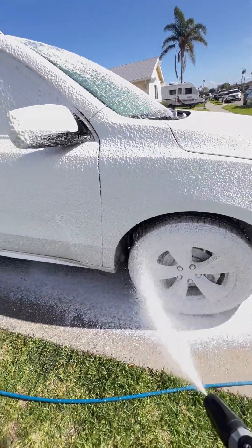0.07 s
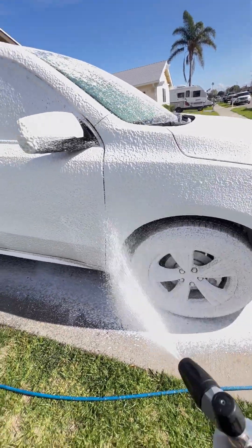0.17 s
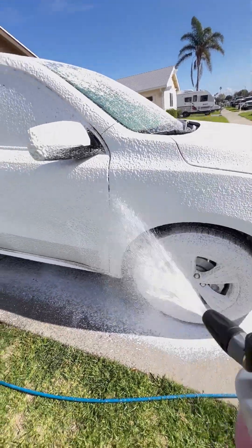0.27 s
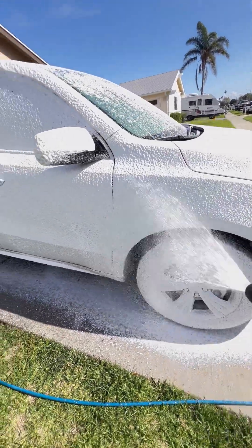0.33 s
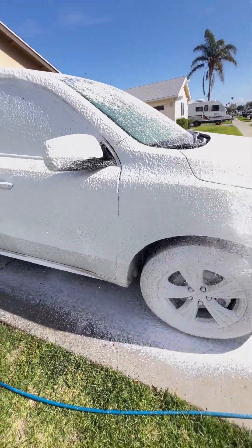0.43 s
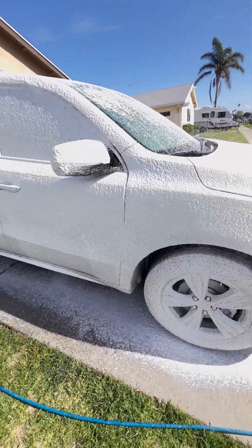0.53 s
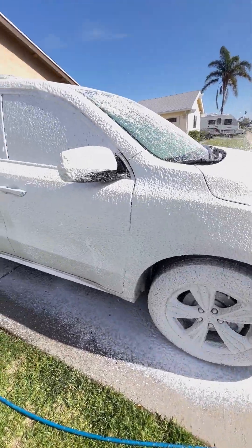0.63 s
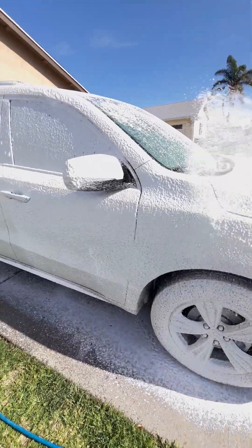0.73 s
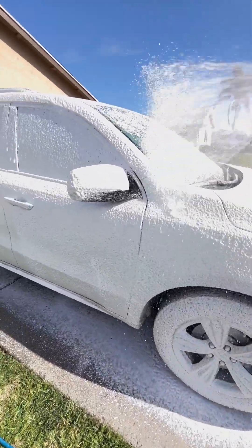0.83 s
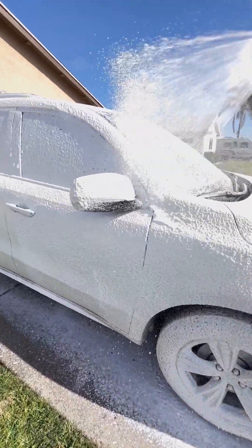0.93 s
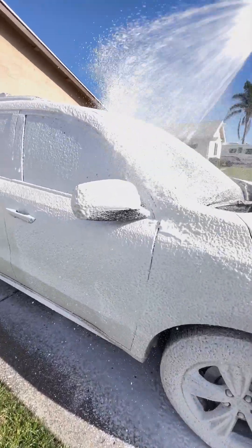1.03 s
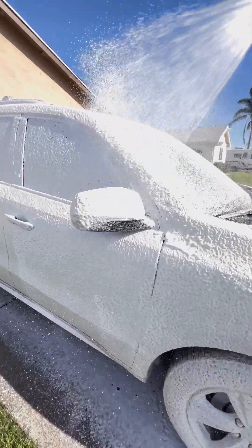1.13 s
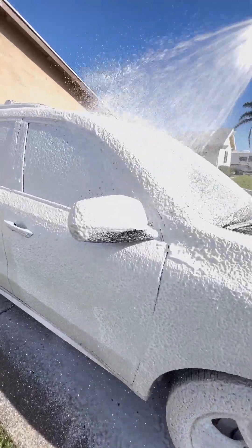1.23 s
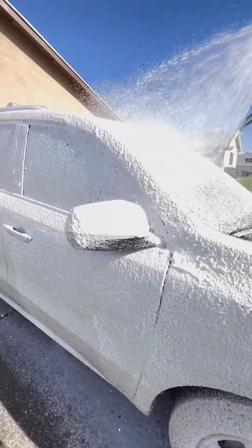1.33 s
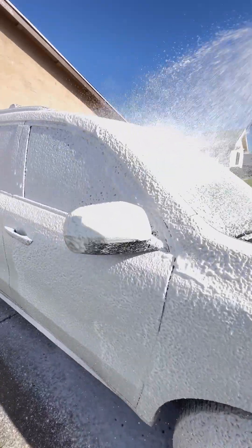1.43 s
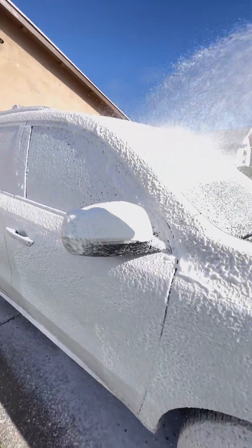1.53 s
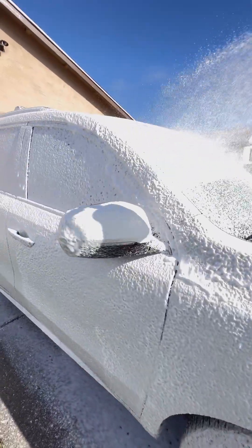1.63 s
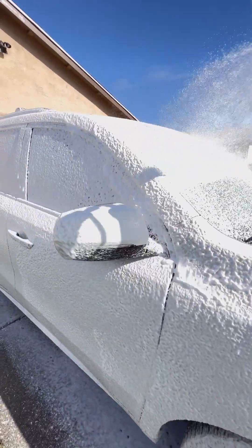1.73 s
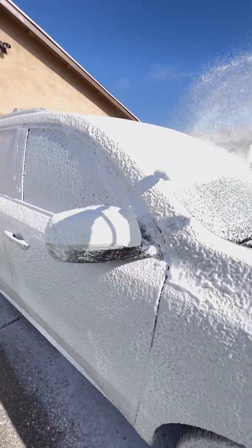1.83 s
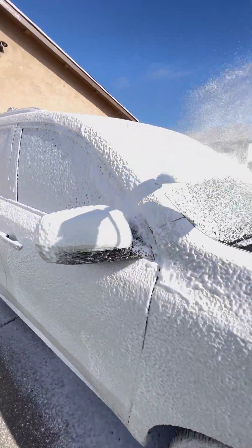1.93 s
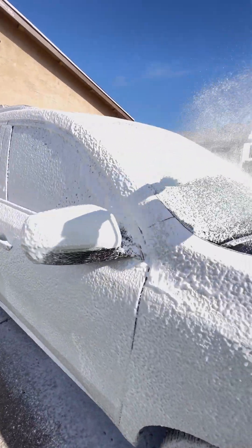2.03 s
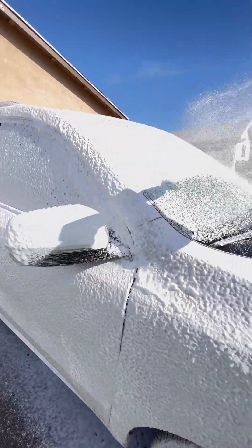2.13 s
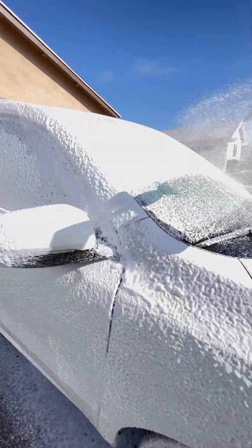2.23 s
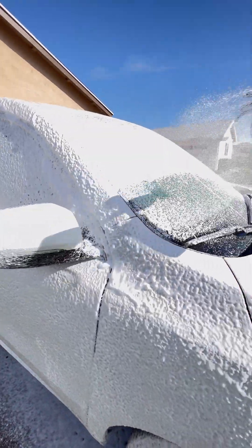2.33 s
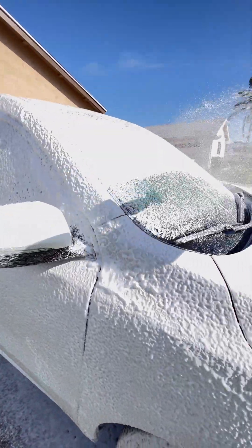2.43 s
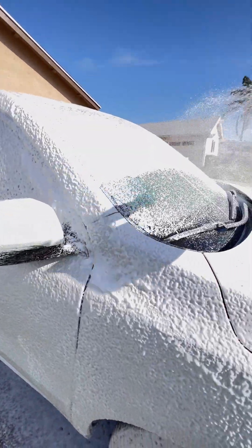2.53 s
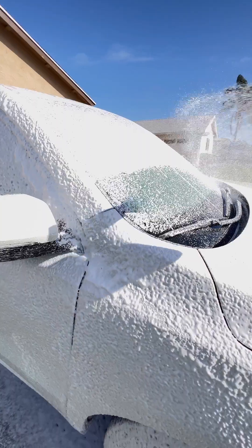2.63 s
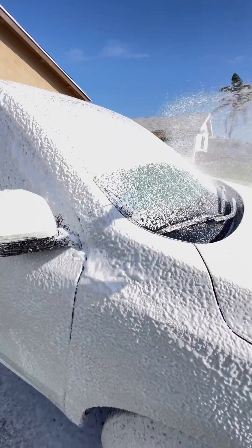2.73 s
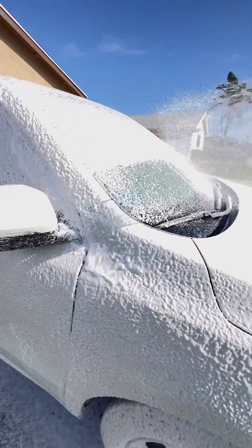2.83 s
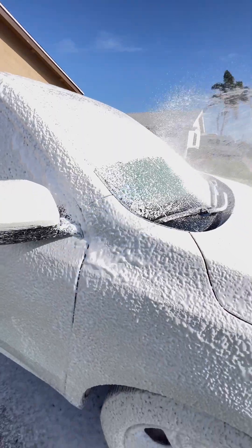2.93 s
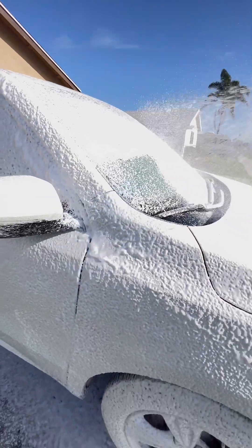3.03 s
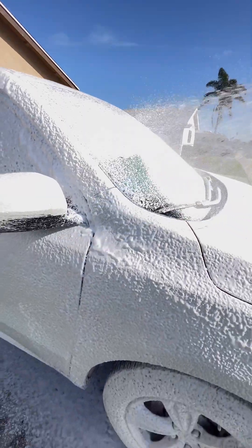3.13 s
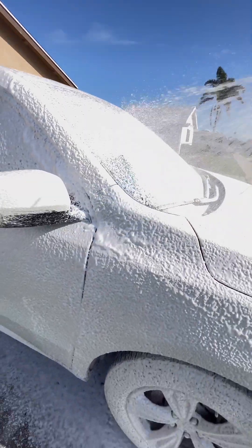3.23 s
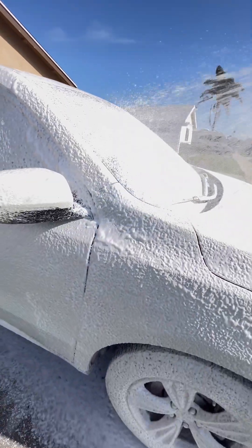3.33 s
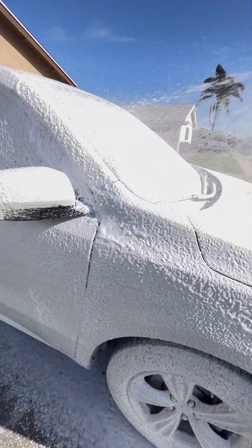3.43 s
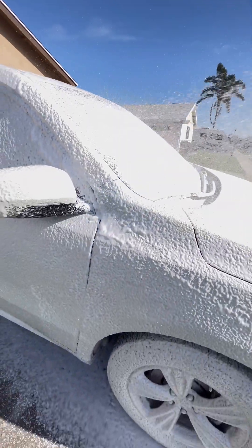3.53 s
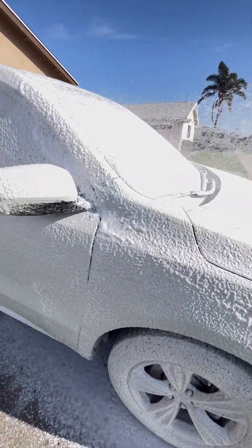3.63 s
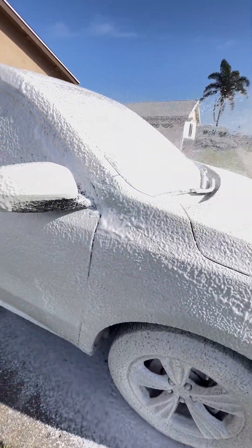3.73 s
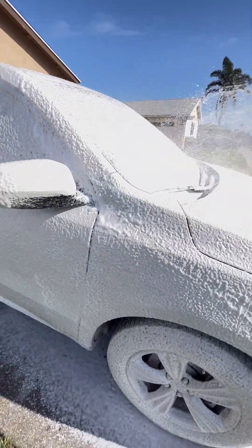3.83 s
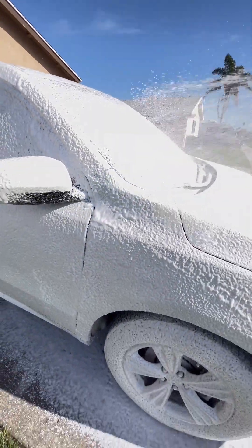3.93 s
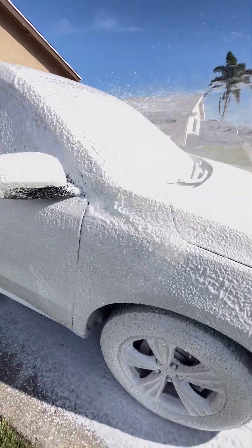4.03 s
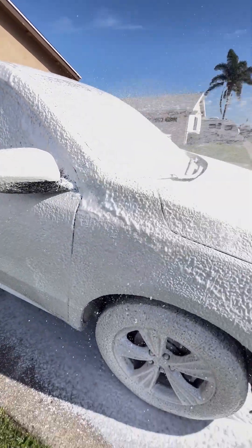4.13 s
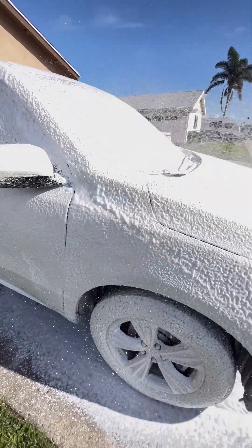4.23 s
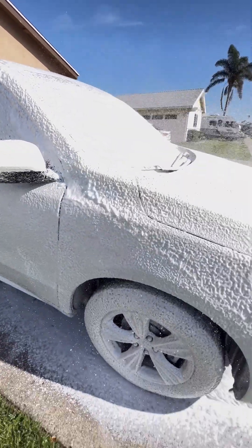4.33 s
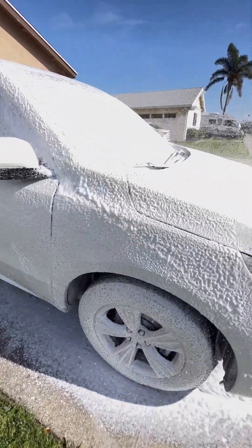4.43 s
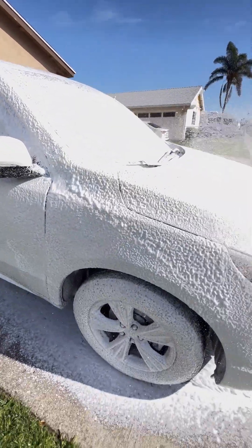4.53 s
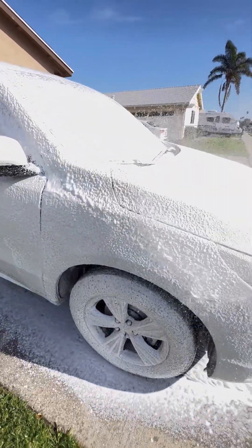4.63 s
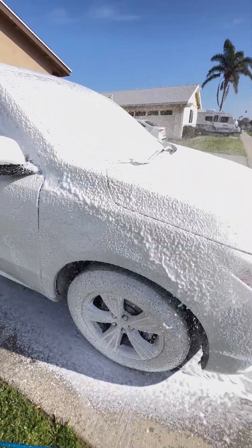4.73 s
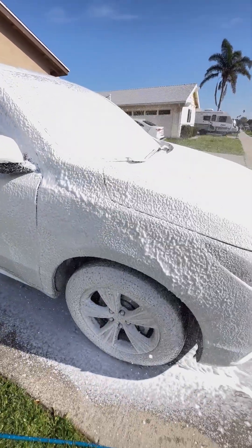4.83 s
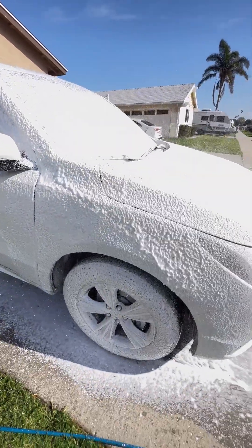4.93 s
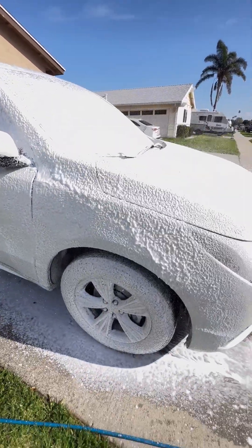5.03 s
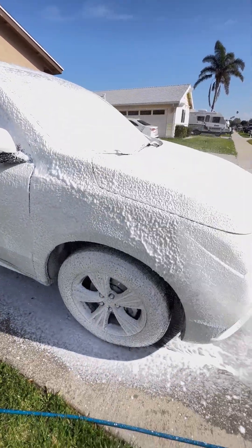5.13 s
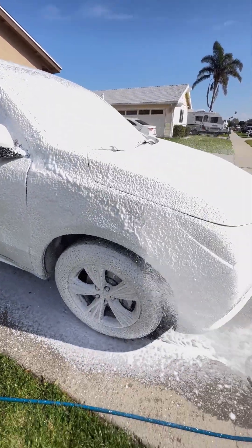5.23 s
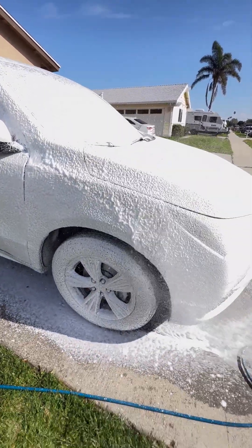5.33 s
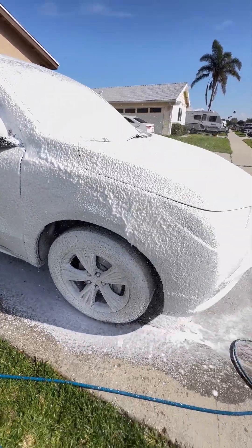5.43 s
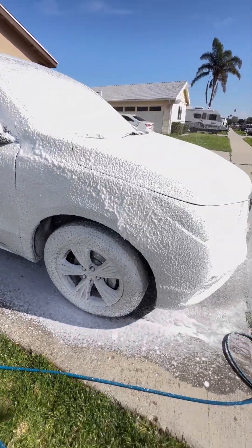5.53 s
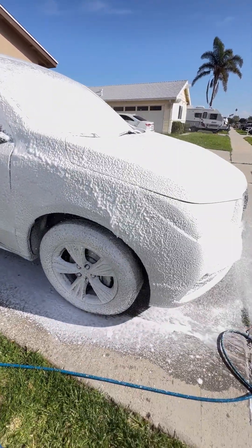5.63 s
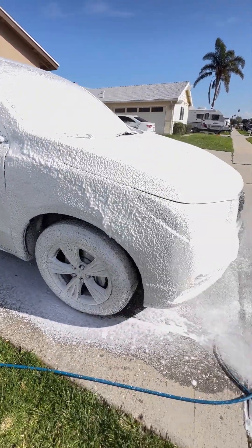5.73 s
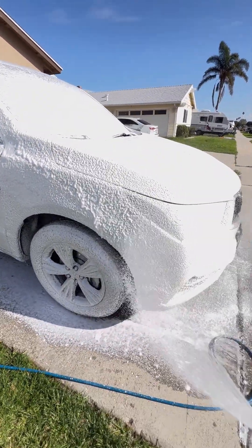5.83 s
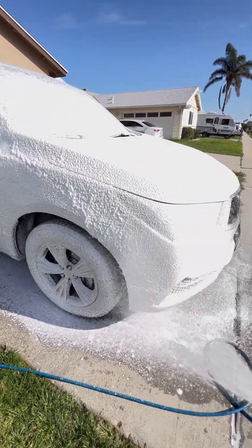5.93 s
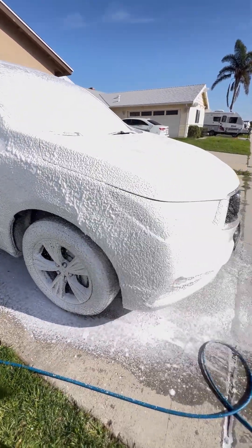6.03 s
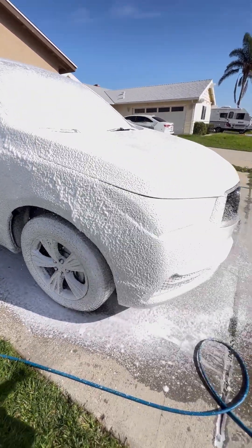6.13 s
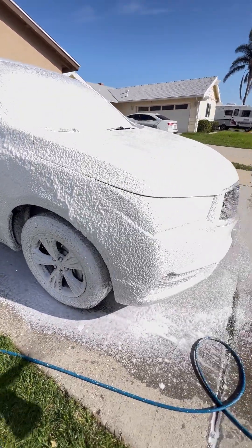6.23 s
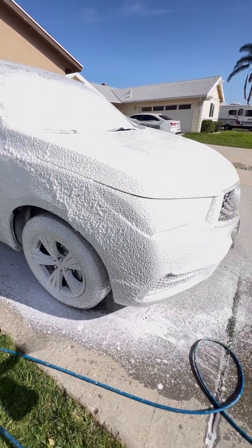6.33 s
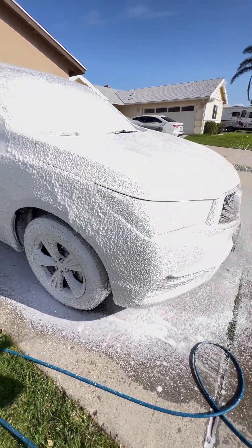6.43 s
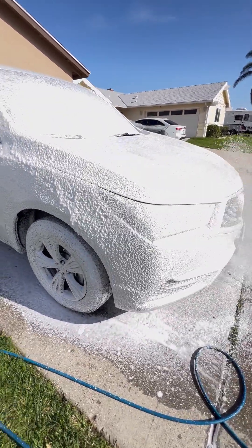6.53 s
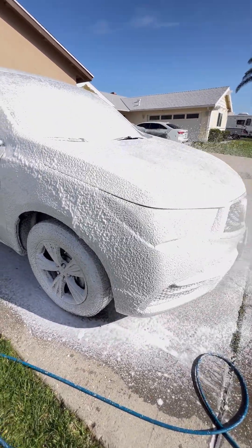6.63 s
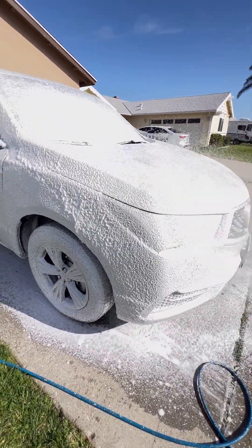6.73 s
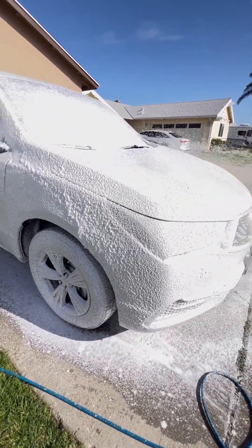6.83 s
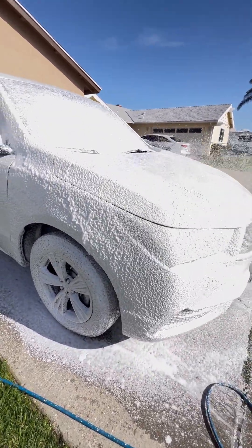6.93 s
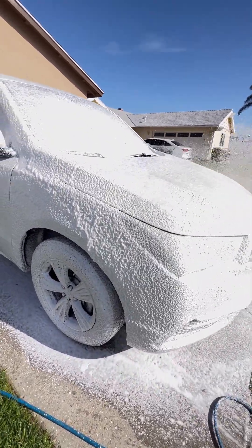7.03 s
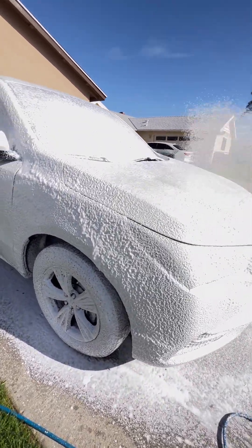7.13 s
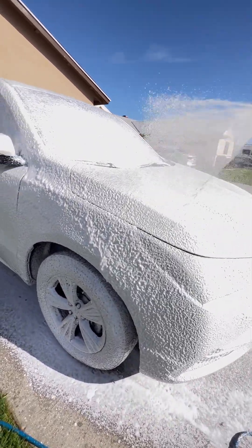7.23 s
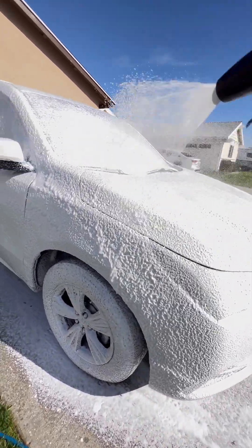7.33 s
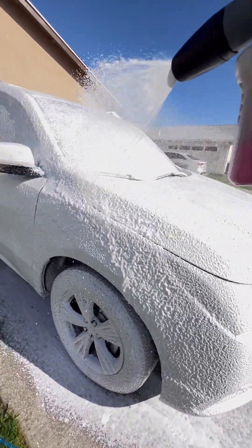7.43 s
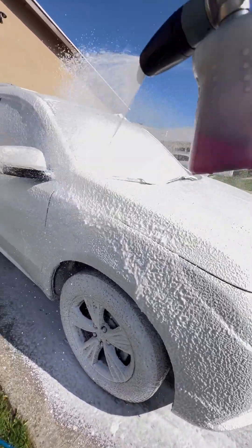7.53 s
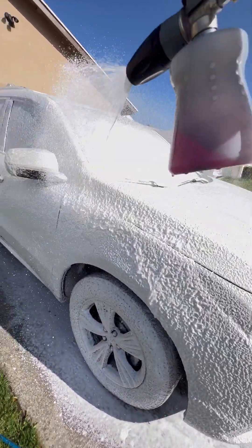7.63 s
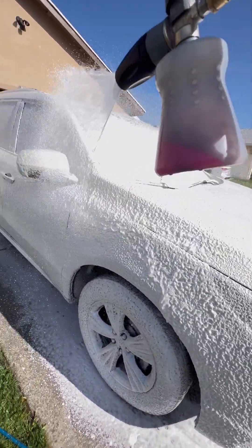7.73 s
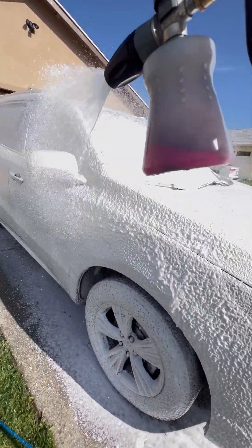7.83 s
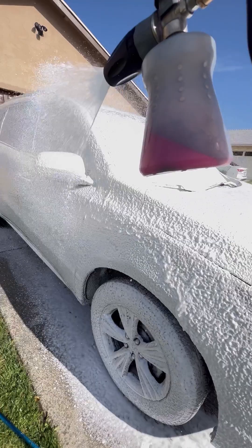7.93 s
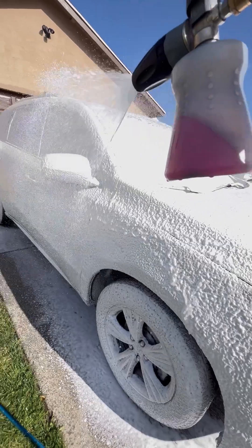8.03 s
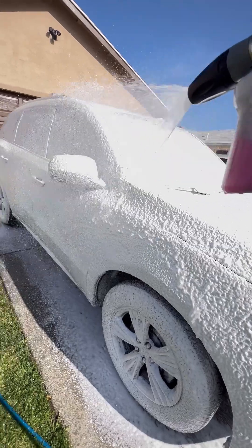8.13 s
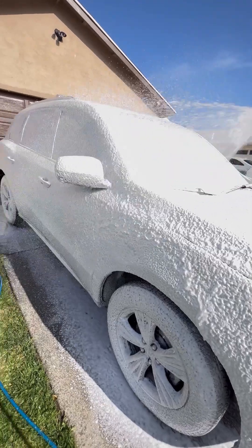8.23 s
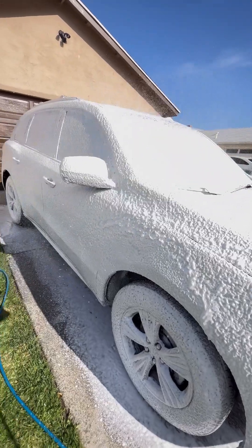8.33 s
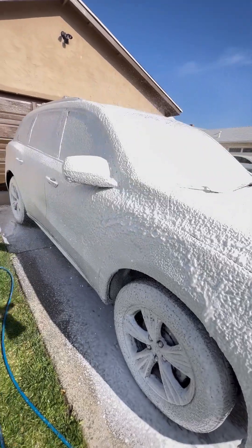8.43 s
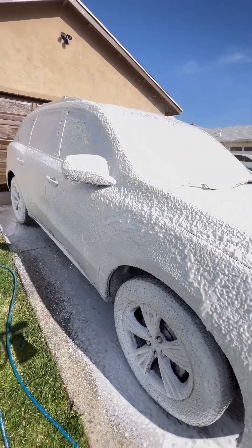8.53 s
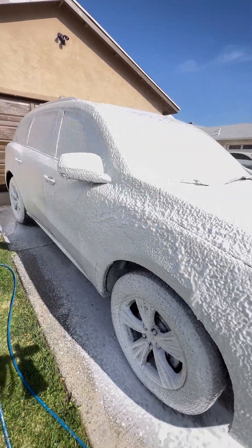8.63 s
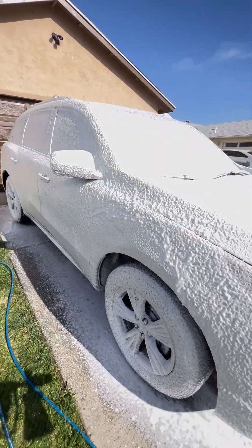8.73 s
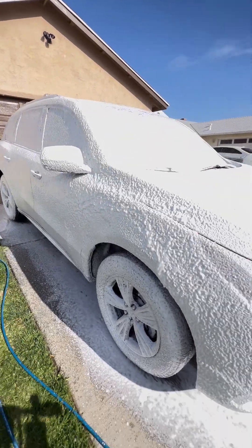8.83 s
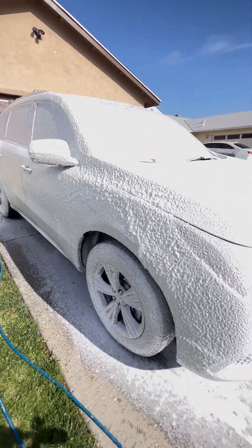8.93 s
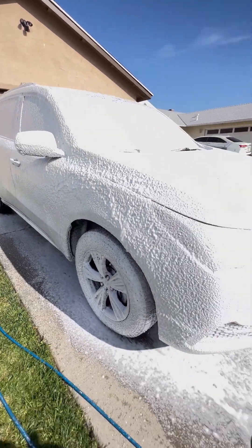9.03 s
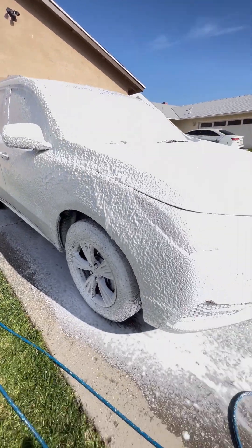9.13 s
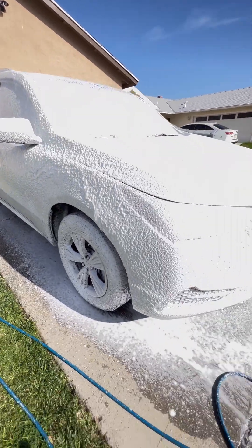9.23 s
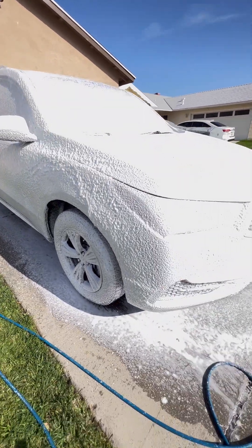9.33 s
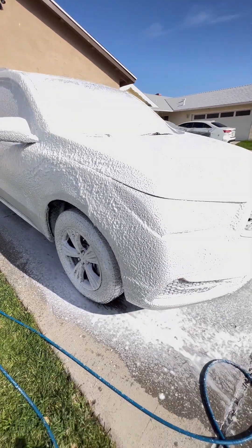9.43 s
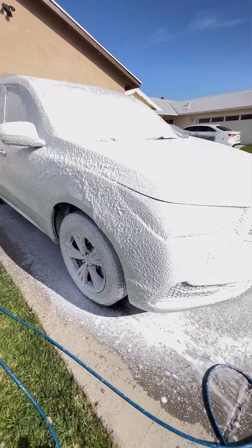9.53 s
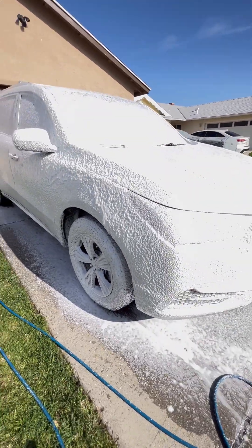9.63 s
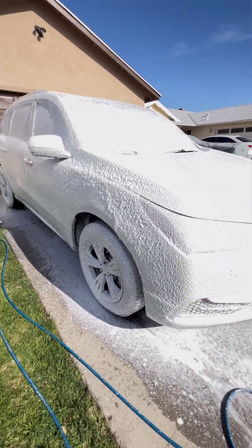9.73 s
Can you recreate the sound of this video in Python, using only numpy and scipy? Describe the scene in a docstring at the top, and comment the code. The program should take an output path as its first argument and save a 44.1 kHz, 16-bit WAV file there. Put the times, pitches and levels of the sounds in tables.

```python
"""A roaring, ringing, whistling spray sweeps to and fro over a car, foam fizzing on its panels; a pump throbs.
The trigger is let go: the spray stops, the nozzle wheezes, the pump fades, and an idling engine and raspy
chirps (probably a bird) come through. A head-worn pair of microphones hears it close by, in a driveway.
Spray, rumble and street are shaped noise frames, pump and engine sums of orders, chirps hoarse glides."""
import sys
import numpy as np
from scipy import signal
from scipy.fft import rfft, irfft, next_fast_len
from scipy.io import wavfile
from scipy.ndimage import uniform_filter1d, map_coordinates

SR = 44100
rng = np.random.default_rng(int(sys.argv[2]) if len(sys.argv) > 2 else 0)


def int16_out(signal):
    """Quantize to a 16-bit WAV file."""
    q = np.round(np.clip(np.atleast_2d(signal).T, -1, 1) * 32767)
    wavfile.write(sys.argv[1], SR, q.astype(np.int16))


N = 430857
TIME_S = np.arange(N) / SR
RELEASE_S = 8.257  # trigger let go
FRAME = dict(fs=SR, nperseg=1024, noverlap=768)
FRAME_HZ, FRAME_S, _ = signal.stft(np.zeros(N), **FRAME)
FRAME_HZ = FRAME_HZ[:, None]


def amp(db):
    """dB to gain."""
    return 10 ** (np.asarray(db) / 20)


def unit(x):
    """Scaled to rms 1."""
    return x / np.sqrt(np.mean(np.abs(x) ** 2) + 1e-20)


def along(points, hz):
    """(Hz, value) points read on a log axis."""
    f, v = np.transpose(points)
    return np.interp(np.log(hz + 1), np.log(f + 1), v)


def curves(rows, t):
    """The columns after the time, read at times t."""
    s, *cols = np.transpose(rows)
    return np.array([np.interp(t, s, c) for c in cols])


def wobble(rate, t):
    """A smooth random curve, rate knots a second."""
    return map_coordinates(rng.standard_normal(int(t[-1] * rate) + 4), [t * rate])


def modes(rows, hz):
    """Summed gain of resonances (centre Hz, half width Hz, dB)."""
    return sum(amp(db) / (1 + ((hz - c) / w) ** 2) for c, w, db in rows)


def bump(hz, centre_hz, half_hz, power):
    """A bell over frequency, 1 at its centre; a higher power squares it off."""
    return 1 / (1 + ((hz - centre_hz) / half_hz) ** power)


def to_sound(z):
    """Noise frames back to samples."""
    return signal.istft(z, **FRAME)[1][..., :N]


def rush(gain, likeness, patchy_db, grains_db=0):
    """Stereo noise frames with a spectrum, complex left-right likeness, random patches and fine grains."""
    grain = uniform_filter1d(rng.standard_normal(N), size=9)
    noise = rng.standard_normal((2, N)) * amp(grains_db * grain)
    _, _, (a, b) = signal.stft(unit(noise), **FRAME)
    field = uniform_filter1d(rng.standard_normal(a.shape), size=8, axis=0)
    field = uniform_filter1d(field, size=14, axis=1)
    right = np.conj(likeness) * a + np.sqrt(1 - np.abs(likeness) ** 2) * b
    return np.array([a, right]) * unit(gain) * amp(patchy_db * unit(field))


def ways_round_head():
    """Jet likeness at the ports: delayed ways weighted by head turn, plus one that moves with the sweep."""
    # how much later the left port hears each way [ms]
    lags_ms = (-.25, .023, .25, .5, .68)
    # head turn: (time [s], turn [<0 left port first, >0 from ahead and the right])
    turn_rows = [(0, 0.6), (.3, 0.39), (.5, 0.08), (.85, -0.41), (1.3, -0.16), (1.5, -0.047), (1.85, -0.44),
                 (2.75, -0.15), (3, -0.71), (4, -0.095), (4.3, -0.43), (5, 0.66), (6, 0.58), (6.3, -0.26),
                 (6.75, 0.21), (7, -0.34), (7.5, -0.16), (7.8, -0.28), (8.25, -0.19)]
    # (time [s], left port a whole cycle behind [Hz], ports opposed again [Hz], strength)
    sweep_rows = [(.15, 1100, 1900, 0), (.5, 1150, 1800, .4), (1, 900, 1250, .7), (1.3, 950, 1380, 1),
                  (1.6, 1230, 1720, 1.2), (2, 1500, 1950, 1.2), (2.4, 1380, 1870, 1.2),
                  (2.8, 900, 1450, 1.1), (3.1, 850, 1200, .8), (3.35, 840, 1500, .8), (3.75, 880, 1850, .8),
                  (4.05, 880, 1500, .7), (4.35, 900, 1900, .7), (4.6, 1200, 1900, .15), (5, 1400, 1900, 0),
                  (6.45, 1400, 1900, 0), (6.7, 1480, 2100, .5), (7.1, 1400, 2000, .5), (7.4, 880, 1280, .9),
                  (8.3, 880, 1280, .9)]
    opposed_hz = 620  # ports always half a cycle apart here
    turn = curves(turn_rows, FRAME_S)[0]
    to_right = np.maximum(turn, 0)
    strengths = [np.maximum(-turn, 0), 0.092 + 0.48 * to_right, 0.012 + to_right, 0.42, 0.24]
    ways = sum(w * np.exp(-2j * np.pi * FRAME_HZ * ms / 1000) for w, ms in zip(strengths, lags_ms))

    cycle_hz, again_hz, strength = curves(sweep_rows, FRAME_S)
    # strongest in the low range
    strength = 3 / (1 + (FRAME_HZ / opposed_hz) ** 8) + strength / (1 + (FRAME_HZ / (again_hz + 250)) ** 6)
    span_hz = np.where(FRAME_HZ < cycle_hz, cycle_hz - opposed_hz, again_hz - cycle_hz)
    above = 2 - np.abs(FRAME_HZ - cycle_hz) / span_hz
    half_cycles = np.where(FRAME_HZ < opposed_hz, (FRAME_HZ / opposed_hz) ** 2, above)
    ways = ways + strength * np.exp(-1j * np.pi * half_cycles)
    return ways / np.sqrt(np.abs(ways) ** 2 + .012)


def roar(around):
    """Broad jet noise with a gliding lowest mode and a middle band whose centre and level wander."""
    # spectrum: (frequency [Hz], density [dB per Hz])
    spectrum = [(200, -29), (300, -11.5), (520, -10), (635, -6), (690, 5.5), (800, 3.5), (950, 0.5),
                (1400, 1), (1750, -2.5), (2050, 0.5), (2350, -11.5), (3200, -13), (4200, -59)]
    # lowest mode: (time [s], level [dB], centre [Hz], lean to the right at each port [dB])
    low_mode = [(0, 6, 820, 3.5), (.3, -0.5, 814, 3.5), (.8, 3, 754, 2), (1.4, -0.5, 760, 2),
                (2.1, 1.5, 890, 1.5), (2.55, 1.5, 800, 0.5), (2.9, 0.5, 720, 3.5), (3.1, 1.5, 680, 3.5),
                (3.6, 1.5, 705, 2), (4.2, -0.5, 786, 2.5), (4.6, 5, 790, 1.5), (4.9, 0.5, 810, 0),
                (5.3, -0.5, 760, 1.5), (6.2, 2, 790, 2), (6.8, -1.5, 810, 2.5), (7.4, 4, 760, 4.5),
                (8.25, 4, 730, 5)]
    # wandering middle band: (time [s], centre [Hz], level [dB])
    mid_band = [(0.0, 1630, 7.5), (0.85, 1740, 0), (1.56, 1920, 2.5), (1.86, 1410, -3), (2.82, 1500, 4),
                (3.1, 1370, 5), (3.49, 1560, -1), (3.86, 1460, 2), (4.13, 1400, 6), (4.3, 1620, 3.5),
                (4.78, 1410, 2), (5.17, 1440, 1), (6.36, 1490, 1), (7.24, 1850, 2.5), (8.25, 1810, 2.5)]
    low_db, low_hz, lean_db = curves(low_mode, FRAME_S)
    mid_hz, mid_db = curves(mid_band, FRAME_S)
    # the lower edge slides with the mode, which lies at 760 Hz in the spectrum
    slid_hz = FRAME_HZ * (1 + (760 / low_hz - 1) / (1 + (FRAME_HZ / 1200) ** 4))
    z = rush(amp(along(spectrum, slid_hz)), .95 * around, patchy_db=1.5, grains_db=3)
    right_db = lean_db * bump(FRAME_HZ, 720, 260, 4) - 2.1 * (FRAME_HZ < 520)
    z = z * amp([-right_db, right_db])
    return z * amp(low_db * bump(FRAME_HZ, low_hz, 220, 4) + mid_db * bump(FRAME_HZ, mid_hz, 260, 2))


def ring(around):
    """Noise in two ringing bands whose centres and lower level wander."""
    # lower, then upper band: (half width [Hz], level [dB])
    bands = [(380, -1.5), (220, 4.5)]
    # wandering upper band: (time [s], centre [Hz])
    upper_rows = [(0.0, 3620), (1.17, 3470), (1.35, 3360), (1.88, 3610), (2.2, 3550), (2.4, 3300),
                  (2.76, 3530), (3.33, 3420), (3.75, 3560), (4.57, 3450), (4.82, 3630), (5.7, 3630),
                  (6.57, 3470), (7.19, 3590), (7.97, 3460), (8.25, 3400)]
    # wandering lower band: (time [s], centre [Hz], added level [dB])
    lower_rows = [(0.0, 2720, 7), (1.35, 2720, 1), (1.61, 3000, 1.5), (2.41, 2760, -2.5), (3.47, 2660, -1),
                  (3.75, 2970, 1), (4.18, 2880, -7), (4.3, 2510, 1), (4.82, 2630, 5), (6.78, 2700, 1),
                  (7.01, 2600, -12), (7.21, 2820, 4.5), (8.04, 2800, -2), (8.25, 2490, -1)]
    upper_hz = curves(upper_rows, FRAME_S)[0]
    lower_hz, lower_db = curves(lower_rows, FRAME_S)
    (lower_width_hz, lower_base_db), upper = bands
    gain = modes([(lower_hz, lower_width_hz, lower_base_db + lower_db), (upper_hz, *upper)], FRAME_HZ)
    return rush(gain, .85 * around, patchy_db=2.2, grains_db=3)


def whistle(around):
    """A narrow noise peak, its frequency axis scaled to glide."""
    # before gliding, the second row too weak to hear: (centre [Hz], half width [Hz], level [dB])
    peaks = [(6400, 620, 54), (6600, 4800, -37)]
    # (time [s], peak [Hz])
    peak_rows = [(0.0, 6300), (2.16, 6440), (2.23, 6050), (2.53, 6420), (5.06, 6130), (5.14, 6600),
                 (5.47, 6500), (5.54, 6160), (5.95, 6600), (6.18, 6090), (6.55, 6320), (8.25, 6300)]
    glide = peaks[0][0] / curves(peak_rows, FRAME_S)[0]
    return rush(modes(peaks, FRAME_HZ * glide), .55 * around, patchy_db=2.1, grains_db=4)


def fizz(treble_excess_db):
    """Grainy foam noise; its top follows the treble and a hollow near 4.8 kHz comes and goes."""
    # spectrum: (frequency [Hz], density [dB per Hz])
    spectrum = [(500, -35), (1200, 1.5), (3000, -1), (4600, 2.5), (5400, -0.5), (8000, 5), (9600, 0),
                (11400, 2.5), (12600, -2.5), (15800, -2.5)]
    # gain near 4.8 kHz: (time [s], level [dB])
    hollow = [(0, 0), (3.9, 1), (4.3, -3), (4.6, 0.5), (4.9, -5.5), (5.6, -3.5), (6.1, -3), (6.5, 4),
              (6.75, 2.5), (8.25, 4.5)]
    hollow_db = curves(hollow, FRAME_S)[0] * bump(FRAME_HZ, 4800, 900, 4)
    ahead = np.exp(-2j * np.pi * FRAME_HZ * 0.021 / 1000)  # left port 0.021 ms later
    z = rush(amp(along(spectrum, FRAME_HZ) + hollow_db), .75 * ahead, patchy_db=1.5, grains_db=5)
    return z * amp(0.42 * treble_excess_db / (1 + (12000 / (FRAME_HZ + 1)) ** 8))


def car_echo():
    """Gain at each port where car echoes meet the direct sound: narrow dips or ridges that glide."""
    # each port's lower and upper track: (time [s], centre [Hz], level [dB])
    left_low = [(0, 1500, 0), (.4, 1150, -15), (.8, 950, -4), (1.2, 1060, -4), (1.5, 1320, -6),
                (1.75, 1610, -18), (2.05, 1780, -11), (2.35, 1600, -12), (2.7, 1300, -13), (3.05, 990, -11),
                (3.5, 930, -14), (4.15, 1100, -8), (4.4, 1200, -13), (5.5, 1240, -13), (6.2, 1320, -11),
                (6.5, 1100, -9), (7.3, 940, -13), (7.7, 1050, -20), (8.25, 950, -14)]
    left_high = [(1.3, 2050, 3), (1.5, 2000, 4), (2.6, 2080, 4.5), (2.8, 2040, 4.5), (4.2, 1840, 3),
                 (4.4, 1850, -19), (4.7, 1700, -11), (4.85, 1700, -2), (6.55, 1900, 0), (6.8, 1800, -9),
                 (7, 1750, -7)]
    right_low = [(1.2, 780, 0), (1.5, 1080, -8), (1.75, 1260, -13), (2, 1330, -8), (2.3, 1240, -5),
                 (2.5, 1090, -6), (2.8, 990, 7.5), (3.15, 810, 1)]
    right_high = [(.5, 1950, -1), (.8, 1750, -9), (1.1, 1890, -17), (1.25, 1910, -9), (2.5, 2100, 4),
                  (2.62, 1950, -10), (2.85, 1600, -6), (2.92, 1500, -6), (2.98, 1950, -12),
                  (3.2, 1700, -22), (3.6, 1830, -2), (3.95, 1660, -18), (4.3, 1870, -4), (4.7, 1790, -6),
                  (5, 1800, -2), (5.25, 1900, -22), (5.5, 2020, -4), (5.8, 1750, -19), (6, 1900, -10),
                  (6.2, 1950, 0), (7.1, 1990, 0), (7.4, 1650, -7), (7.8, 1580, -2), (8.25, 1550, -1)]

    def port_db(low, high):
        # low track is the echo's second null; shallower repeats lie up the comb
        repeats = [np.multiply(low, (1, odd / 3, 0.41)) for odd in (5, 7)]
        tracks = [curves(rows, FRAME_S) for rows in (low, high, *repeats)]
        return sum(db * bump(FRAME_HZ, hz, 75, 2) for hz, db in tracks)

    return amp([port_db(left_low, left_high), port_db(right_low, right_high)])


def jet():
    """Nozzle noise and foam fizz swell with the sweep, then die apart: pressure bleeds off, foam lands."""
    # at the reference treble: (time [s], then level [dB] and left over right [dB] of roar, ring, whistle)
    level_rows = [(0, -31.5, 0, -33, -4, -33, 8), (0.3, -23.5, -4, -31.5, 1, -32.5, -1),
                  (0.5, -26.5, -1, -32, -2, -31.5, 0), (1.4, -27.5, 2.5, -30.5, -2.5, -27, 4.5),
                  (2.2, -27.5, 1, -29.5, -2, -30.5, 0), (2.9, -26, 0.5, -26, -0.5, -28, -2),
                  (3.7, -24.5, -1.5, -25.5, -1, -29.5, 1), (4.2, -28, -6.5, -26.5, 6, -30, 0.5),
                  (4.6, -27, -9, -29, -4.5, -37, -2), (5.1, -26, -2, -37, 2, -36, 4),
                  (5.3, -24.5, 1.5, -34, -11.5, -34, 1.0), (5.5, -27.5, -1, -39, 9, -36, -1.0),
                  (5.8, -25, -1, -32, -4, -29.5, 4), (6.2, -27, -1.5, -34, 4, -35.5, 0.5),
                  (6.5, -24, -4, -34.5, -6, -34.5, 2), (6.8, -29, -9.5, -26.5, 0, -33.5, -4),
                  (7.2, -25.5, 0, -31.5, 0.0, -28, -1.0), (7.4, -26, 9, -30, -4, -29, 6),
                  (8.25, -26, 7.5, -25, -3, -28, 10)]
    # treble as the nozzle swings to and fro: (time [s], level [dB])
    treble_rows = [(0.0, -39), (0.11, -40), (0.37, -35), (0.48, -32.5), (0.87, -34), (0.99, -32),
                   (1.15, -34.5), (1.22, -36), (1.54, -42.5), (2.04, -46), (2.66, -46), (2.94, -40),
                   (3.08, -35.5), (3.38, -31), (3.68, -39), (3.81, -40), (3.93, -33), (4.04, -31),
                   (4.25, -33.5), (4.46, -38.5), (4.52, -32.5), (4.59, -35), (4.73, -31.5), (4.78, -31.5),
                   (4.89, -40), (5.01, -40), (5.1, -36.5), (5.19, -38), (5.33, -36.5), (5.42, -34),
                   (5.56, -44), (5.65, -42.5), (5.74, -40.5), (5.86, -40), (6.02, -35.5), (6.2, -42.5),
                   (6.48, -44.5), (6.71, -34.5), (6.78, -34.5), (7.03, -43.5), (7.31, -35.5), (7.47, -40.5),
                   (8.09, -43.5), (8.16, -39), (8.25, -37)]
    # roar, ring, whistle: gain per dB of treble [dB]
    follows = (0.29, 0.17, 0.42)
    # roar, ring, whistle: own flutter [dB]
    flutter_db = (.6, 1.6, 1.2)
    # last faint hiss from the nozzle: (time [s], level [dB])
    dribble_rows = [(8.3, -75), (8.325, -62), (8.35, -72), (8.41, -70), (8.44, -56), (8.48, -61),
                    (8.515, -59), (8.54, -66), (8.62, -75)]
    treble_reference_db, fizz_over_db = -34.5, 8
    flight_s, fall_db = .04, 14  # airborne foam still lands, thinning

    treble_db = curves(treble_rows, FRAME_S)[0]
    excess_db = treble_db - treble_reference_db
    around = ways_round_head()
    parts = [roar(around), ring(around), whistle(around), fizz(excess_db)]

    table = curves(level_rows, FRAME_S)
    levels_db = [db + follow * excess_db + own * wobble(24, FRAME_S)
                 for db, follow, own in zip(table[::2], follows, flutter_db)]
    levels_db.append(treble_db + fizz_over_db + 0.5 * wobble(22, FRAME_S))
    sides_db = [*table[1::2], np.full(len(FRAME_S), -.8)]
    sputter_db = 0.073 * wobble(20, FRAME_S) + 0.28 * wobble(7.3, FRAME_S)  # air and soap mix unevenly
    mixed = [part * amp(db + sputter_db + np.outer([.5, -.5], side_db))[:, None]
             for part, db, side_db in zip(parts, levels_db, sides_db)]
    nozzle, foam = to_sound(np.array([sum(mixed[:3]), mixed[3]]) * car_echo())

    late_s = np.maximum(TIME_S - RELEASE_S, 0)
    valve = amp(-60 * late_s / .035)  # pressure behind the nozzle bleeds off
    landing = amp(-fall_db * late_s / flight_s - 60 * np.maximum(late_s - flight_s, 0) / .03)
    dribble = unit(to_sound(parts[3] + parts[2])) * amp(curves(dribble_rows, TIME_S)[0])
    return nozzle * valve + foam * landing + dribble * (late_s > 0)


def yard(x):
    """House wall and driveway answer: a noise tail where each frequency dies at its own speed."""
    # (frequency [Hz], t60 [s])
    decay = [(500, 0.11), (2200, 0.29), (4000, 0.23), (6000, 0.24), (12000, 0.014)]
    hz, t, z = signal.stft(rng.standard_normal((2, SR // 2)), SR, nperseg=256)
    tail = signal.istft(z * amp(-60 * t / along(decay, hz)[:, None]), SR, nperseg=256)[1]
    return signal.fftconvolve(x, tail / np.linalg.norm(tail[0]), axes=1)[:, :N]


def drone(speed, orders, lean_db, waver_db, swells, third_lag=0, count=4):
    """Orders of a turning cycle, the lowest count nearly in step as one beat; all but the fourth waver."""
    cycle = 2 * np.pi * np.cumsum(curves(speed, TIME_S)[0]) / SR
    slow_s = TIME_S[::100]
    out = np.zeros(N)
    for k, db in orders:
        swell_db = sum(peak_db * np.exp(-((slow_s - s) / half_s) ** 4)
                       for order, s, half_s, peak_db in swells if order == k)
        own_db = waver_db * (k != 4) * wobble(2.2, slow_s)
        size = amp(db + lean_db[::100] * (k > 4) + swell_db + own_db)
        phase = rng.normal(0, .3 if k <= count else 3) - 2 * np.pi * third_lag * (k == 3)  # lag in cycles
        out += np.interp(TIME_S, slow_s, size) * np.cos(k * cycle + phase)
    return np.sqrt(2) * out


def pump():
    """Shaft orders throb over noise rumble and thumps; after the release it slows, then fades."""
    # shaft speed: (time [s], speed [Hz])
    shaft = [(0, 19.1), (1.5, 19.2), (3.2, 19.13), (5.2, 19.22), (7.2, 19.14), (8.3, 19.18), (8.43, 19),
             (8.6, 17.3), (9.77, 17.3)]
    # before port gain: (time [s], throb [dB], lean of orders above 4 [dB])
    throb_rows = [(0, -37, 0), (4, -36.5, -3), (4.3, -38, 2), (5, -39, 0.5), (6.7, -40, 4), (8.3, -38, 1),
                  (8.55, -40, -2), (8.62, -45, 0)]
    # (order, relative level [dB])
    orders = [(1, -52), (2, -18), (3, -6), (4, 2.5), (5, -15.5), (6, -11), (7, -10), (8, -13.5), (9, -14.5),
              (10, -11), (11, -24), (12, -16), (13, -20), (14, -24), (15, -24.5), (16, -40), (17, -26),
              (18, -17)]
    # single orders swell or fade: (order, time [s], half length [s], change [dB])
    swells = [(12, 6.35, .5, 9), (10, 6.5, .5, -8), (10, 7.85, .6, 5), (10, .4, .7, -6), (10, 4.9, .7, 2),
              (6, 1.9, 2.4, -8), (18, 5.2, .8, 4), (18, 3.6, .6, -8), (18, 8.3, .1, 6), (3, 8.5, .07, 8)]
    # rumble: (frequency [Hz], density [dB per Hz])
    spectrum = [(25, -50), (45, -6), (80, 5.5), (110, -11), (150, -12.5), (250, -10), (450, -10),
                (650, -19), (2200, -31), (4000, -30), (9000, -43)]
    # dull low thumps, before port gain: (time [s], half length [s], level [dB])
    thump_rows = [(4.18, 0.022, -40), (6.848, .09, -35.5), (8.447, 0.12, -42)]
    throb_db, lean_db = curves(throb_rows, TIME_S)
    # without flow the upper rumble thins out
    eased_db = 6 * (FRAME_HZ > 200) * np.clip((FRAME_S - RELEASE_S) / .12, 0, 2)
    likeness = -.1 + 1.0 / (1 + (90 / (FRAME_HZ + 1)) ** 4)
    z = rush(amp(along(spectrum, FRAME_HZ) - eased_db), likeness, patchy_db=1.5)
    thumps = sum(amp(db) * np.exp(-((TIME_S - s) / half_s) ** 2) for s, half_s, db in thump_rows)
    rumble = (amp(-45.5 + 1.9 * wobble(1.98, TIME_S)) + thumps) * to_sound(z)

    hum = drone(shaft, orders, lean_db, waver_db=1.5, swells=swells, third_lag=.27, count=8)
    hum = amp(throb_db) * hum
    ports = np.array([np.interp(TIME_S - .0003, TIME_S, hum), hum])  # left port hears it later
    running = amp(-60 * np.maximum(TIME_S - 8.54, 0) / 0.3)
    return (ports + rumble) * running * amp([[.7], [-.7]])


def street():
    """The quiet wash of the neighbourhood: steady noise, more alike at both ports in the bass."""
    # (frequency [Hz], density [dB per Hz])
    spectrum = [(40, 0.5), (90, 6.5), (250, -8), (340, -9), (800, -11), (2200, -18), (3700, -19),
                (4400, -25.5), (6200, -26.5), (7800, -23.5), (8800, -30.5), (12000, -40), (15800, -44)]
    lag = np.exp(-1.7j / (1 + (420 / (FRAME_HZ + 1)) ** 4))
    likeness = (0.4 + 0.35 / (1 + (FRAME_HZ / 400) ** 4)) * lag
    z = rush(amp(along(spectrum, FRAME_HZ)), likeness, patchy_db=.8, grains_db=2.2)
    return amp(-47.5) * to_sound(z)


def wheeze():
    """The draining nozzle: a faint hoarse band, a gliding sine times noise, that stutters."""
    # before stutter: (time [s], centre [Hz], level [dB])
    track = [(8.28, 2300, -66), (8.33, 2250, -57), (8.42, 2200, -58), (8.46, 3000, -72), (8.52, 3300, -60),
             (8.56, 2500, -72), (8.6, 2400, -66), (8.64, 2300, -78)]
    hz, db = curves(track, TIME_S)
    band = unit(wobble(600, TIME_S) * np.sin(2 * np.pi * np.cumsum(hz) / SR))
    return amp(db + 2.3 * wobble(40, TIME_S)) * band * (TIME_S > RELEASE_S)


def idle():
    """An idling engine: orders of its firing cycle, rising after the release."""
    # firing cycle: (time [s], rate [Hz])
    firing = [(0, 21.2), (8.6, 21.2), (8.8, 20.9), (9.05, 21.3), (9.77, 21.35)]
    # before port gain: (time [s], level [dB], lean of orders above 4 [dB])
    level_rows = [(8.35, -61, 0), (8.6, -39.5, -9), (8.8, -44, 0.5), (9, -41, -4), (9.3, -40.5, -3.5),
                  (9.77, -40.5, -3.5)]
    # (order, relative level [dB])
    orders = [(1, -37), (2, -16), (3, -7.5), (4, -2.5), (5, -5.5), (6, -3.5), (7, -13), (8, -6), (9, -2),
              (10, -16.5), (11, -17), (12, -13.5), (13, -13), (14, -14), (15, -23), (18, -33), (20, -26.5)]
    # (order, time [s], half length [s], change [dB])
    swells = [(9, 8.78, 0.13, 2.5), (9, 9.1, 0.18, -4), (4, 8.8, 0.17, 1), (3, 8.85, .2, -9),
              (20, 9.05, 0.27, 8), (18, 9.6, .24, 13), (12, 8.7, .17, -12), (13, 8.7, .17, -7),
              (14, 8.7, .17, -9), (8, 9.55, .25, 2.5), (10, 9.3, .35, 9)]
    db, lean_db = curves(level_rows, TIME_S)
    hum = drone(firing, orders, lean_db, waver_db=1.5, swells=swells)
    return amp(db) * hum * amp([[.8], [-.8]])


def chirps():
    """Short gliding whistles with a weak undertone an octave down, made raspy by noise."""
    # before envelope and port gain: (time [s], length [s], level [dB], start [Hz], mid [Hz], end [Hz])
    calls = [(8.85, .07, -55, 4500, 5800, 6400), (8.915, .035, -51, 6200, 6000, 5200),
             (9.06, .035, -57, 5200, 6200, 5600), (9.2, .04, -57, 5200, 6200, 7000),
             (9.248, .04, -52, 7000, 6600, 4400), (9.44, .03, -56, 4800, 6300, 5500),
             (9.575, .045, -52, 5200, 6200, 6300), (9.615, .08, -48.5, 6700, 6500, 6100)]
    out = np.zeros(N + SR)
    for s, length_s, db, start_hz, mid_hz, end_hz in calls:
        t = np.arange(round(length_s * SR)) / SR
        u = t / length_s
        arch = np.sin(np.pi * u)
        hz = (1 - u) * start_hz + u * end_hz + arch * (mid_hz - (start_hz + end_hz) / 2)
        phase = 2 * np.pi * np.cumsum(hz + 300 * wobble(150, t)) / SR
        # noise spreads the whistle into a band
        rasp = wobble(1800, t) * amp(4 * wobble(400, t) + 3 * wobble(50, t))
        voice = unit(rasp * (np.sin(phase) + 0.3 * np.sin(phase / 2)))
        out[round(s * SR):][:len(t)] += amp(db) * arch ** 0.6 * voice
    return out[:N] * amp([[.6], [-.6]])


def scene():
    """All sources; the yard answers spray and chirps."""
    spray, bird = jet(), chirps()
    answer = yard(amp(-15) * spray + amp(-4) * bird)
    return spray + answer + pump() + street() + wheeze() + idle() + bird


def record(dry):
    """The deepest bass rolls off below about 33 Hz; nothing passes above 15.8 kHz."""
    m = next_fast_len(N)
    hz = np.fft.rfftfreq(m, 1 / SR)
    gain = (hz < 15800) / (1 + (33 / (hz + 1)) ** 6)
    return irfft(rfft(dry, m) * gain, m)[:, :N]


dry = scene()
out = record(dry)
int16_out(out)
```